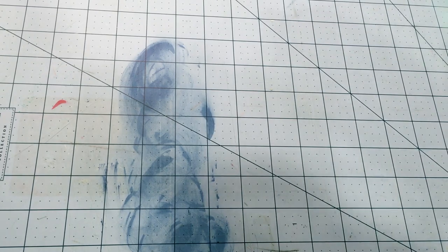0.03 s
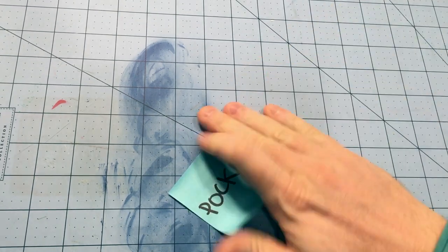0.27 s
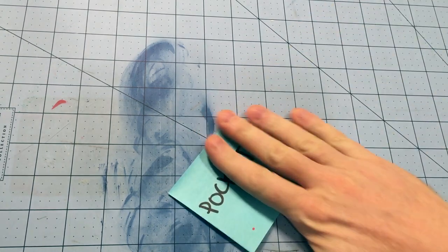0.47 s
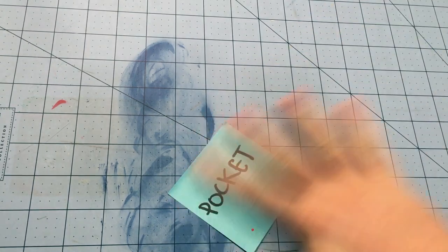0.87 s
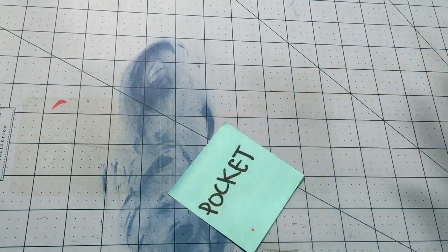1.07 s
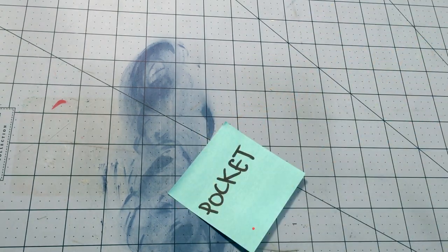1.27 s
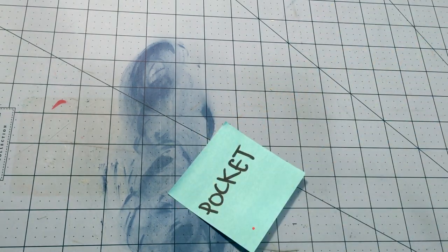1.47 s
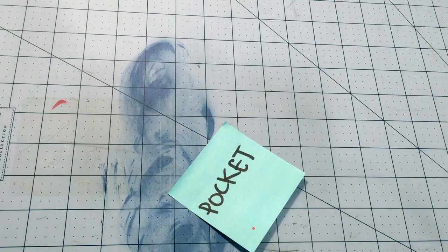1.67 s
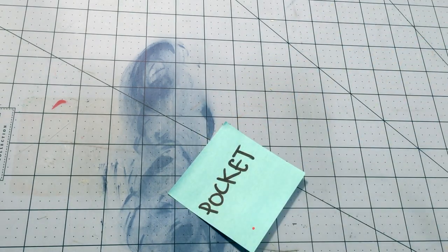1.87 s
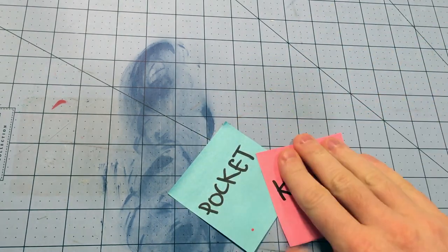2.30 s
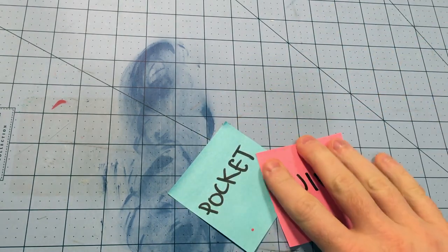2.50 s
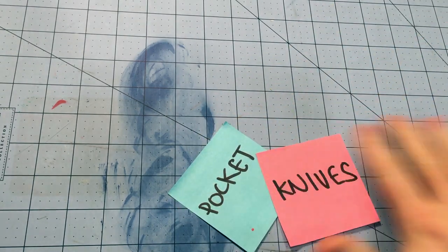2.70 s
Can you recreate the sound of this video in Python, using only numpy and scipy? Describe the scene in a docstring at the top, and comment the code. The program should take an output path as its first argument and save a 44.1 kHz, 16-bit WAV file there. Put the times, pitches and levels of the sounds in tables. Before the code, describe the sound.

Two slaps of paper notes on a tabletop, with soft rubbing and a crackly peel.

```python
"""A faint brush of paper, then a slap: a hand lands a sticky note on a cutting mat.
The table thuds and sways, and something loose on it rocks to rest. Fingers rub the note
smooth, a sleeve rustles faintly, the next note crackles off its pad as the glue lets go, and
a second slap puts that one down too. A small quiet room with a mains hum echoes briefly."""
import sys
import numpy as np
from scipy import signal
from scipy.fft import rfft, irfft
from scipy.io import wavfile
from scipy.ndimage import uniform_filter1d

SR = 44100
rng = np.random.default_rng(int(sys.argv[2]) if len(sys.argv) > 2 else 0)


def bounce(signal):
    """Save signal as a 16-bit WAV file at the path given by the first command-line argument."""
    frames = np.transpose(np.atleast_2d(signal))
    limited = np.clip(frames, -1, 1)
    pcm = np.round(limited * 32767).astype(np.int16)
    wavfile.write(sys.argv[1], SR, pcm)


N = 125685
T = np.arange(N) / SR
HZ = np.fft.rfftfreq(4096, 1 / SR)
OCTAVES = np.log2(np.maximum(HZ, 100) / 4000)  # distance from 4 kHz, for tilting a tone


def amp(db):
    """Turns decibels into a gain."""
    return 10 ** (np.asarray(db) / 20)


def curve(points, hz=HZ):
    """Joins (frequency, value) points along a log-frequency axis."""
    point_hz, value = np.transpose(points)
    return np.interp(np.log(hz + 1), np.log(point_hz + 1), value)


def add(mix, start, sound):
    """Mixes a sound in at a start time in seconds."""
    part = mix[max(round(start * SR), 0):][:len(sound)]
    part += sound[:len(part)]


def colour(x, db):
    """Gives a sound the tone of a dB curve; white noise keeps its overall level."""
    log_gain = np.log(amp(np.maximum(db - db.max(), -100)))
    mirrored = np.r_[log_gain, log_gain[-2:0:-1]]
    response = np.exp(np.conj(signal.hilbert(mirrored)))  # rings only after a hit, never before
    taps = np.fft.ifft(response).real
    return signal.fftconvolve(x, taps / np.linalg.norm(taps))[:len(x)]


def resonances(rows):
    """A dB curve with a peak for each (frequency, half-width, level) row."""
    power = sum(amp(db) ** 2 / (1 + ((HZ - hz) / width) ** 2) ** 2 for hz, width, db in rows)
    return 10 * np.log10(power)


def burst(db, rise, decay, size=16384):
    """Noise that rises quickly, then falls to about a third every `decay` seconds."""
    t = T[:size]
    level = amp(db) * np.minimum(t / rise, 1) * np.exp(-np.maximum(t - rise, 0) / decay)
    return level * rng.choice([-1., 1.], size)


def grains(per_s, spread_db, size):
    """Tiny random clicks of uneven strength, with an overall level of 1."""
    clicks = rng.choice([-1., 1.], size) * (rng.random(size) < per_s / SR)
    clicks *= amp(spread_db * np.minimum(rng.exponential(1, size), 4))
    return clicks / (clicks.std() + 1e-12)


def ringing(tones, rise):
    """A struck object rings with several tones, each fading at its own pace."""
    t = T[:SR // 2]
    ring = sum(amp(db - 60 * t / fade) * np.sin(2 * np.pi * hz * t) for hz, db, fade in tones)
    return ring * np.minimum(t / rise, 1)


# tone of the room's steady noise (frequency [Hz], relative level [dB])
ROOM_TONE = [(8, 27), (14, 14), (22, -15.5), (36, 0), (46, -15), (80, -14.5), (130, -24.5), (240, -25),
             (330, -32), (430, -28.5), (800, -33.5), (1500, -38), (2300, -44.5), (6000, -47.5),
             (12000, -46.5), (16000, -57.5)]
HISS_DB, HUM_HZ, HUM_DB = -68, 56.8, -53


def background():
    """The room rumbles and hisses, and the mains power hums."""
    hz = np.fft.rfftfreq(N, 1 / SR)
    spectrum = rfft(rng.standard_normal(N)) * amp(curve(ROOM_TONE, hz))
    hiss_level = irfft(spectrum * (hz > 200), N).std()
    hum = amp(HUM_DB) * np.sqrt(2) * np.sin(2 * np.pi * HUM_HZ * T)
    return amp(HISS_DB) * irfft(spectrum, N) / hiss_level + hum


# how long the walls echo (frequency [Hz], time to fade by 60 dB [s])
ECHO_FADE = [(100, 1), (500, 0.5), (1500, 0.48), (5000, 0.32), (10000, 0.27), (16000, 0.22)]
TAIL_DB, TAIL_RISE_S, EARLY_DB, EARLY_DECAY_S = -13.5, 0.0066, -20, 0.011


def room_echo(x):
    """Sound bounces off the table first, then off the walls in a short tail."""
    t = T[:SR // 2]
    hz, times, spectrum = signal.stft(grains(4000, 0, len(t)), SR, nperseg=256)
    fade = amp(-60 * times / curve(ECHO_FADE, hz)[:, None])
    tail = signal.istft(spectrum * fade, SR, nperseg=256)[1][:len(t)]
    tail *= np.minimum(t / TAIL_RISE_S, 1)
    early = grains(2500, 0, len(t)) * np.exp(-t / EARLY_DECAY_S) * (t > .0015)
    echo = amp(TAIL_DB) * tail / np.linalg.norm(tail) + amp(EARLY_DB) * early / np.linalg.norm(early)
    return signal.fftconvolve(x, echo)[:N]


# the table swinging after a slap (time [s], level [dB], frequency [Hz], decay [s])
TABLE_SWINGS = [(0.238, -14, 13.6, 0.19), (2.266, -18.5, 14.4, 0.058)]


def table_sway():
    """The table swings slowly and shakes the microphone."""
    out = np.zeros(N)
    for start, db, hz, decay in TABLE_SWINGS:
        add(out, start, -amp(db) * np.exp(-T / decay) * np.sin(2 * np.pi * hz * T))
    return out


# the hand leaning on the table (middle time [s], half-length [s], level [dB])
HAND_LEANS = [(0.535, 0.1, -49.5), (0.671, 0.079, -51), (1.642, 0.097, -58.5), (2.38, 0.083, -56),
              (2.6, 0.11, -62)]
# the table top's low notes (frequency [Hz], half-width [Hz], relative level [dB])
DRONE_PEAKS = [(123.8, 14, -2.5), (237.3, 18.7, -7), (398, 27.5, -18)]


def table_drone():
    """The pressing hand makes the table top drone at its lowest notes."""
    level = sum(amp(db) * np.cos(np.pi / 2 * np.clip((T - middle) / half_length, -1, 1)) ** 2
                for middle, half_length, db in HAND_LEANS)
    return colour(level * rng.standard_normal(N), resonances(DRONE_PEAKS))


# finger strokes on paper and, from 0.948 to 1.61 s, a faint, dull sleeve rustle as the arm moves
# (start [s], end [s], level [dB], treble tilt [dB/octave], sheet flutter [dB])
RUBS = [(0.044, 0.184, -68, -1.5, -21), (0.137, 0.275, -60, -1.5, -29), (0.247, 0.326, -36.5, -1, 0),
        (0.304, 0.44, -48, -2, 14), (0.439, 0.628, -54.5, -0.5, 1), (0.683, 0.834, -62.5, .5, -3),
        (0.867, 0.973, -49, -1, -6), (0.948, 1.42, -70, -9, -16), (1.205, 1.61, -76, -1, -12),
        (1.573, 1.67, -61.5, -2.5, -4), (1.674, 1.849, -59, -2, -22), (1.795, 2.11, -72, -2, -17),
        (2.174, 2.27, -50, 1, -9), (2.275, 2.341, -49.5, 5, -11), (2.372, 2.49, -65, 0, 5),
        (2.439, 2.608, -68, -6, -9), (2.61, 2.73, -56, -1, 0), (2.667, 2.794, -54, -3, 4)]
# tone of the rubbing (frequency [Hz], relative level [dB])
RUB_TONE = [(150, -21), (700, -7.5), (1200, -17), (1900, -5), (2900, -5), (4300, 1.5), (7000, 1.5),
            (9500, 0.5), (12500, 2.5), (16000, -13.5)]
RUB_FADE_S, WAVER_DB, SHEET_HZ, SHEET_WIDTH_HZ = 0.074, -1.75, 1570, 160


def fingers_and_sleeve():
    """Fingers slide on paper and a sleeve rustles: thousands of tiny slips blur into a hiss."""
    out, t = np.zeros(N), T[:SR // 2]
    for start, end, db, tilt_db, sheet_db in RUBS:
        swell = np.sin(np.pi / 2 * np.clip(np.minimum(t, end - start - t) / RUB_FADE_S, 0, 1))
        waver = uniform_filter1d(rng.standard_normal(len(t)), size=400)
        level = swell * amp(db + WAVER_DB * waver / waver.std())
        rub = level * grains(per_s=16000, spread_db=3, size=len(t))
        tone = amp(curve(RUB_TONE) + tilt_db * OCTAVES)
        flutter = amp(resonances([(SHEET_HZ, SHEET_WIDTH_HZ, sheet_db)]))
        add(out, start, colour(rub, 20 * np.log10(tone + flutter)))
    return out


# a loose object's knocks (time [s], tick level [dB], clunk level [dB])
KNOCKS = [(0.294, -37, -35.5), (0.412, -39, -43), (0.488, -42.5, -38.5), (0.564, -45.5, -44.5),
          (0.632, -44, -44), (0.708, -56.5, -53), (0.775, -57.5, -54.5), (0.844, -64, -58)]
# its bright tick and dull clunk (frequency [Hz], half-width [Hz], relative level [dB])
TICK_PEAKS = [(730, 330, 1), (1420, 200, -14), (1810, 56, -5), (2100, 157, -5.5), (2560, 250, -6.5),
              (2746, 310, 0)]
CLUNK_PEAKS = [(504, 130, -4), (685, 143, 2), (920, 230, -7), (1550, 280, -9.5), (2030, 270, -10.5)]
# its ringing tones (frequency [Hz], relative level [dB], time to fade by 60 dB [s])
OBJECT_TONES = [(1560, -4, 0.066), (1760, -6, 0.054), (2045, -2, 0.096), (2580, -11, .04),
                (2838, -2, 0.065), (2897, -9.5, 0.044)]
TICK_HISS_DB, RING_DB, BOUNCE_S, BOUNCE_DB, CLUNK_DELAY_S = -23, -5.5, .0085, -2.5, .009


def rocking_object():
    """A loose object ticks, bounces and clunks as it rocks to rest on the swaying table."""
    out = np.zeros(N)
    tick_tone = 20 * np.log10(amp(resonances(TICK_PEAKS)) + amp(TICK_HISS_DB + curve(SMACK_TONE)))
    ring = amp(RING_DB) * ringing(OBJECT_TONES, rise=0.00059)
    for start, tick_db, clunk_db in KNOCKS:
        add(out, start, colour(burst(tick_db, rise=0.0008, decay=0.012), tick_tone))
        add(out, start, amp(tick_db) * ring)
        add(out, start + BOUNCE_S * rng.uniform(0.59, 1.2), amp(tick_db + BOUNCE_DB) * ring)
        clunk = burst(clunk_db, rise=0.0022, decay=0.013)
        add(out, start + CLUNK_DELAY_S, colour(clunk, resonances(CLUNK_PEAKS)))
    return out


# tugs on the glue strip (time [s], level [dB], decay [s], treble tilt [dB/octave])
TUGS = [(1.613, -52.5, 0.069, -1), (1.633, -34.5, 0.0087, 0.5), (1.641, -34.5, 0.011, -3),
        (1.6527, -24, 0.0055, 3.5), (1.658, -26.5, 0.015, 1.5), (1.667, -34.5, 0.012, -2.5),
        (1.786, -51.5, 0.025, -6)]
# tone of tearing glue (frequency [Hz], relative level [dB])
GLUE_TONE = [(100, -11), (280, -9.5), (570, -1), (850, 1), (1200, -0.5), (1430, 6.5), (1650, -3),
             (2000, 4.5), (2800, -4.5), (4500, -1.5), (8000, 0.5), (12500, -6), (16000, -23)]


def glue_peel():
    """The glue tears loose in a few quick crackling tugs."""
    out, t = np.zeros(N), T[:SR // 4]
    for start, db, decay, tilt_db in TUGS:
        tug = amp(db) * np.exp(-t / decay) * grains(per_s=6000, spread_db=-2, size=len(t))
        add(out, start, colour(tug, curve(GLUE_TONE) + tilt_db * OCTAVES))
    return out


# paper cracks and small ticks (time [s], level [dB], decay [s], centre frequency [Hz])
CRACKS = [(0.2246, -28.5, 0.0066, 4170), (0.2374, -23, 0.0042, 3900), (0.251, -36, 0.003, 5800),
          (0.273, -38, 0.0054, 6000), (0.343, -51, .002, 12000), (0.3853, -19.5, 0.00067, 5470),
          (0.4115, -42, 0.0031, 7000), (0.4886, -42.5, 0.0048, 7070), (0.631, -56.5, 0.019, 5800),
          (1.438, -64, 0.0015, 8900), (1.478, -59, 0.0022, 6900), (1.533, -60, 0.0044, 9050),
          (1.636, -24.5, 0.0013, 3460), (2.2574, -35, 0.012, 5850), (2.263, -23.5, 0.0084, 6240)]
SNAP_WIDTH_OCTAVES, SNAP_HISS_DB = 0.32, -5


def paper_snaps():
    """The paper snaps with short bright cracks."""
    out = np.zeros(N)
    for start, db, decay, hz in CRACKS:
        peak = np.exp(-.5 * (np.log2((HZ + 1) / hz) / SNAP_WIDTH_OCTAVES) ** 2)
        tone = 20 * np.log10(peak + amp(SNAP_HISS_DB + curve(SMACK_TONE)))
        add(out, start, colour(burst(db, rise=0.0006, decay=decay), tone))
    return out


# air pushed ahead of the palm (peak time [s], level [dB], rise [s], decay [s])
WHOOSHES = [(0.246, -26, 0.0054, 0.055), (2.265, -32.5, 0.0082, 0.022)]
# tone of that air (frequency [Hz], relative level [dB])
WHOOSH_TONE = [(20, 4), (70, -8.5), (120, 2.5), (170, -11), (220, -1), (320, -15), (900, -29.5),
               (4000, -69)]


def air_puffs():
    """A low whoosh swells as the palm closes on the mat."""
    level = sum(amp(db) * np.exp(-np.maximum((peak - T) / rise, (T - peak) / decay))
                for peak, db, rise, decay in WHOOSHES)
    return colour(level * rng.standard_normal(N), curve(WHOOSH_TONE))


# the mat giving under the palm (time [s], level [dB], frequency [Hz], decay [s])
MAT_THUMPS = [(0.238, -18, 124, 0.022), (0.2325, -27, 270, 0.021), (0.2, -26, 33, 0.061),
              (2.2625, -22, 116, 0.0166), (2.2635, -24.5, 205, 0.0115), (2.259, -27, 34.5, 0.038)]
THUMP_RISE_S = 0.0045


def palm_thumps():
    """The palm's weight lands as low tones that die after a few swings."""
    out = np.zeros(N)
    for start, db, hz, decay in MAT_THUMPS:
        level = amp(db) * np.minimum(T / THUMP_RISE_S, 1) * np.exp(-T / decay)
        add(out, start, level * np.sin(2 * np.pi * hz * T))
    return out


# hand and fingers landing (time [s], smack level [dB], smack decay [s], thud level [dB],
# pop frequency [Hz], pop level [dB], pop half-width [Hz])
LANDINGS = [(0.2312, -25, 0.0088, -26.5, 469, -19, 99), (0.2369, -26.5, 0.0069, -40, 670, -18.5, 70),
            (0.2424, -31, 0.036, -28, 420, -16.5, 79.5), (0.376, -31, .012, -43, 425, -28.5, 133),
            (0.3849, -24.5, 0.0049, -41.5, 198, -30.5, 78), (2.263, -23, 0.0097, -35, 1180, -30.5, 70),
            (2.266, -38, 0.016, -50.5, 555, -28.5, 57.3)]
# tone of smacked paper, also used in snaps and ticks (frequency [Hz], relative level [dB])
SMACK_TONE = [(100, 0), (500, 3.5), (1200, 7.5), (2600, -2.5), (4200, 2.5), (6500, 1), (9000, -4),
              (12500, -4), (16000, -27)]
# table and mat ringing (frequency [Hz], relative level [dB], time to fade by 60 dB [s])
TABLE_TONES = [(121.2, 1, 0.18), (240.4, -20.5, .3), (294, -15, 0.2), (381.4, -11, 0.23), (527, -23, .16),
               (707, -3.5, 0.065), (726, -12, 0.1), (921, -9, 0.15), (1077, -26, 0.09), (1150, -21, 0.22),
               (1215, -15, 0.46), (1314, -16, .26), (1530, -21, 0.23)]


def hand_slaps():
    """Each landing smacks the paper, pops the air trapped under the hand and rings the table."""
    out = np.zeros(N)
    for start, smack_db, decay, thud_db, pop_hz, pop_db, pop_width in LANDINGS:
        smack = burst(smack_db, rise=0.00056, decay=decay)
        pop = burst(pop_db, rise=0.0029, decay=0.0048)
        add(out, start, colour(smack, curve(SMACK_TONE)))
        add(out, start, colour(pop, resonances([(pop_hz, pop_width, 0)])))
        add(out, start, amp(thud_db) * ringing(TABLE_TONES, rise=.002))
    return out


def scene():
    """Mixes everything; only the crisp sounds get the room's echo."""
    crisp = hand_slaps() + paper_snaps() + glue_peel() + rocking_object() + fingers_and_sleeve()
    echo = room_echo(crisp)
    deep = palm_thumps() + air_puffs() + table_drone() + table_sway()
    return (crisp + echo + deep + background())[None]


def record(dry):
    """Cuts off the very highest treble."""
    low_pass = signal.firwin(511, cutoff=16150, window=("kaiser", 9), fs=SR)
    return signal.oaconvolve(dry, low_pass[None], "same")


dry = scene()
out = record(dry)
bounce(out)
```